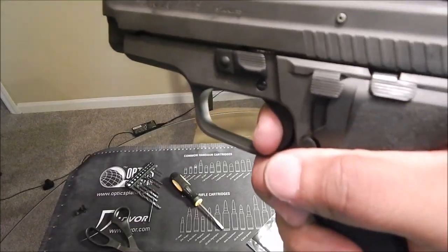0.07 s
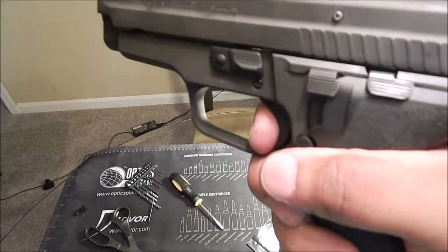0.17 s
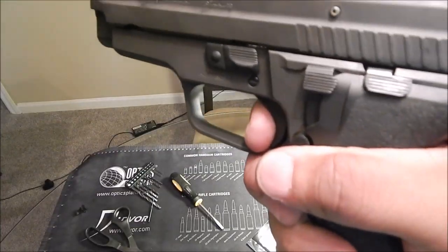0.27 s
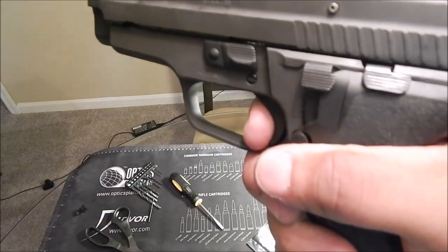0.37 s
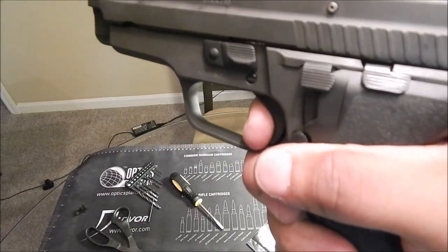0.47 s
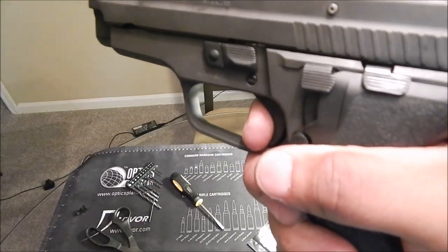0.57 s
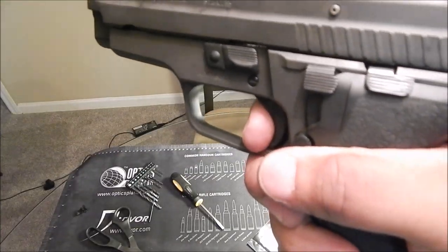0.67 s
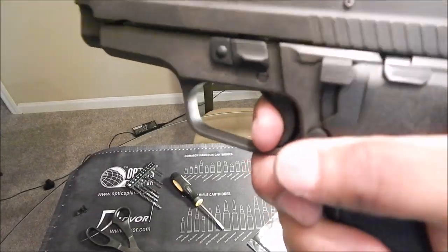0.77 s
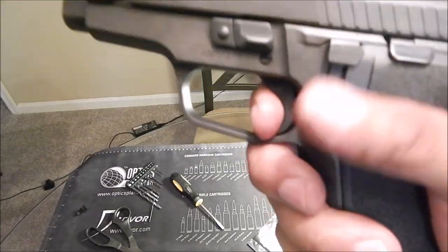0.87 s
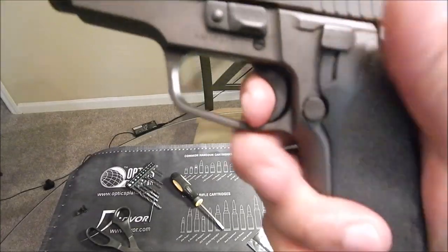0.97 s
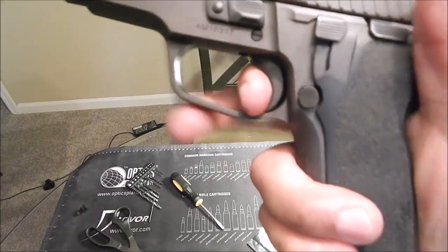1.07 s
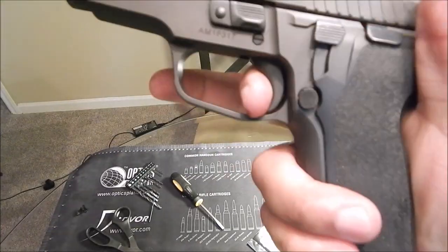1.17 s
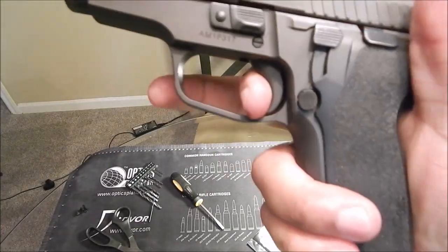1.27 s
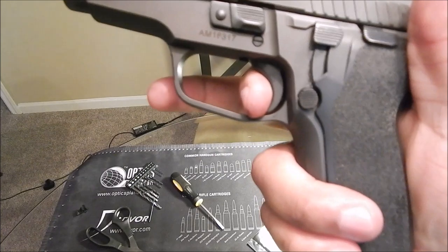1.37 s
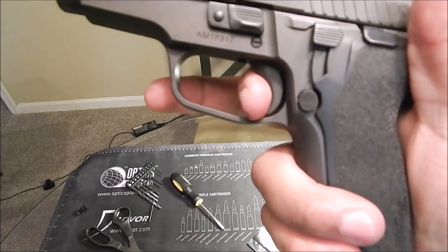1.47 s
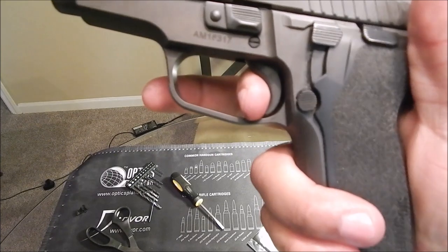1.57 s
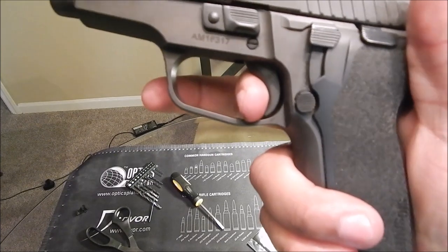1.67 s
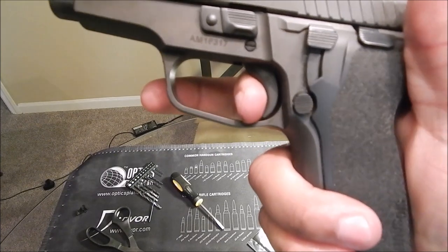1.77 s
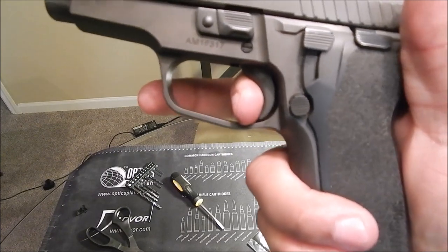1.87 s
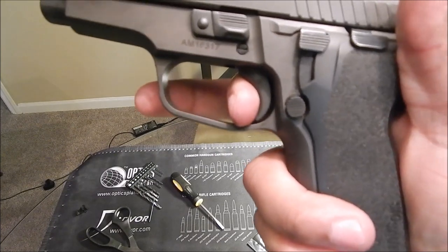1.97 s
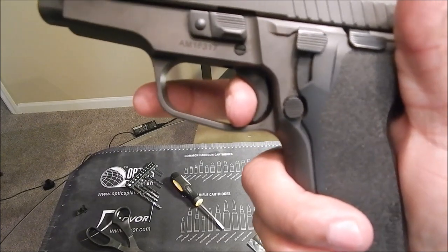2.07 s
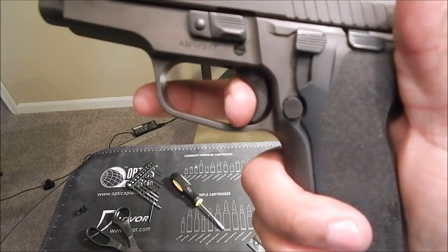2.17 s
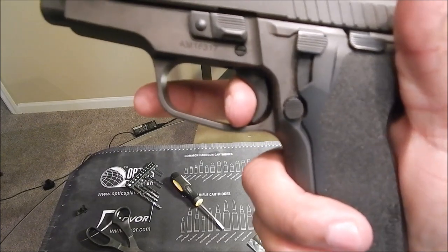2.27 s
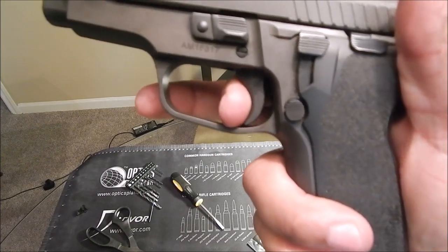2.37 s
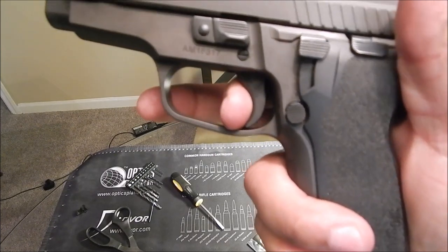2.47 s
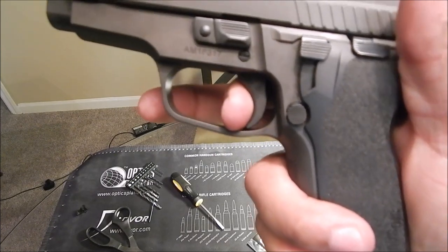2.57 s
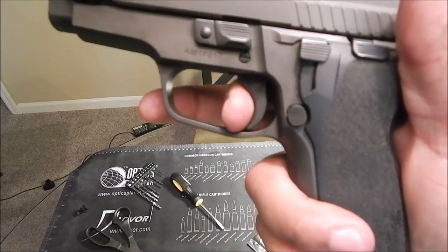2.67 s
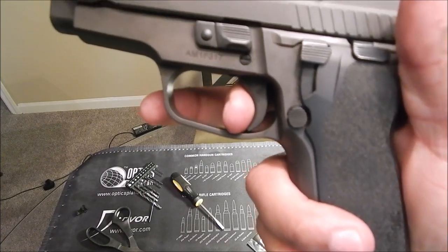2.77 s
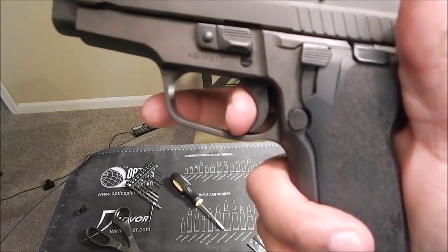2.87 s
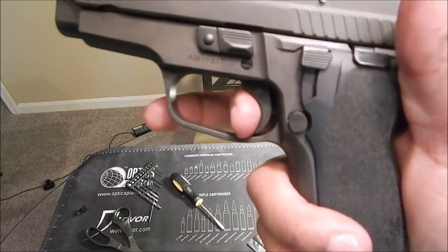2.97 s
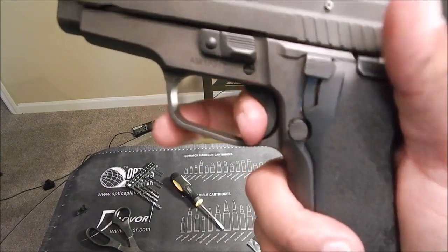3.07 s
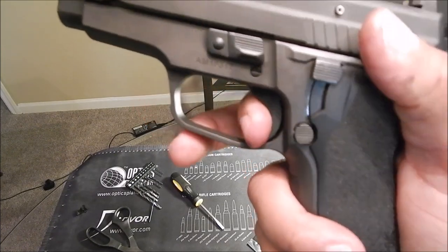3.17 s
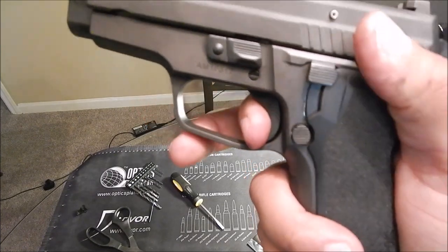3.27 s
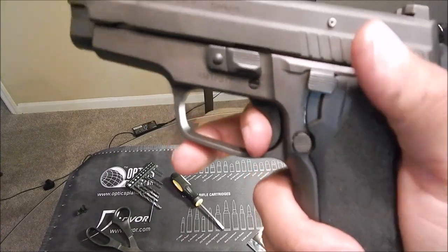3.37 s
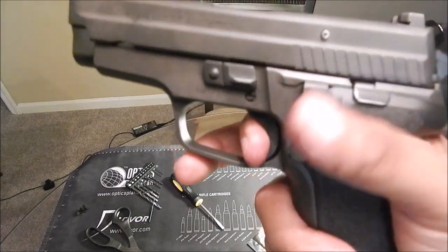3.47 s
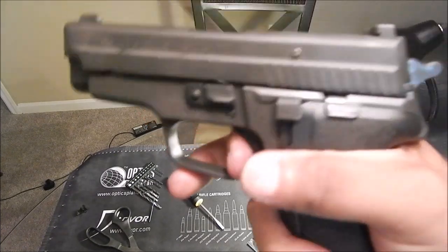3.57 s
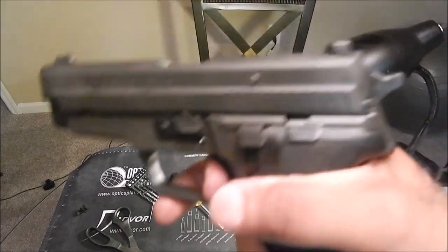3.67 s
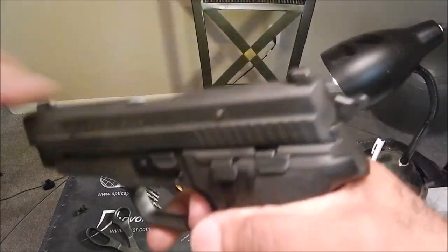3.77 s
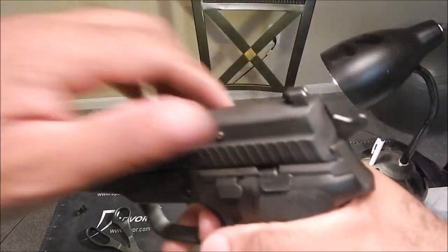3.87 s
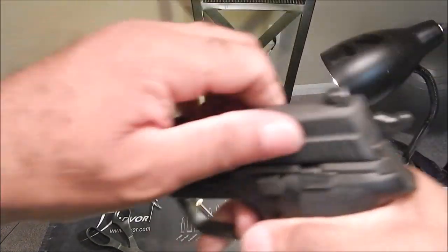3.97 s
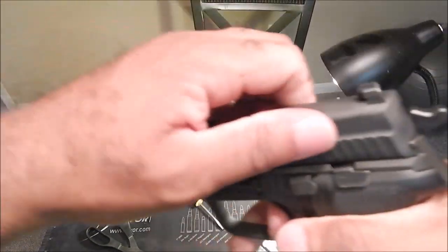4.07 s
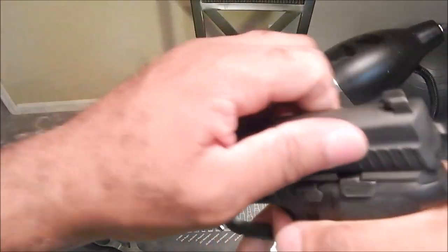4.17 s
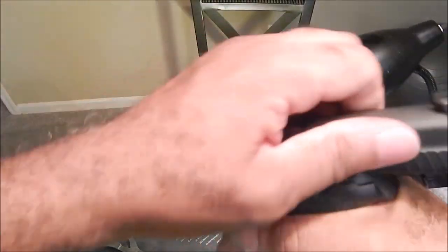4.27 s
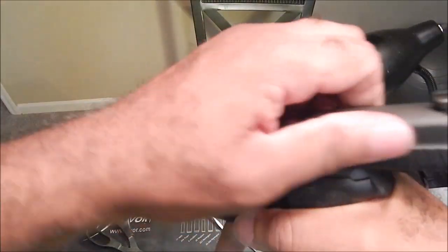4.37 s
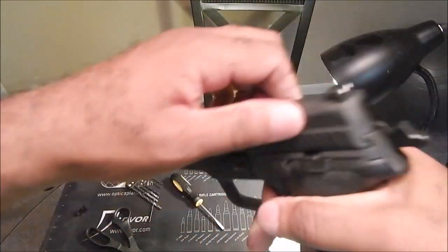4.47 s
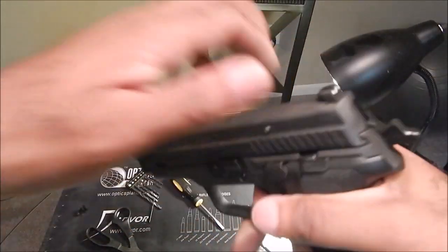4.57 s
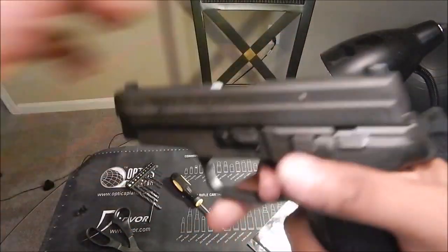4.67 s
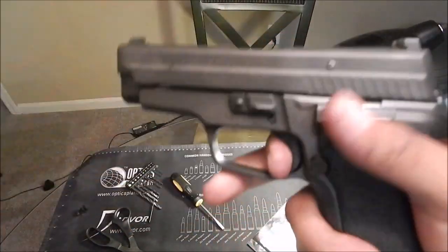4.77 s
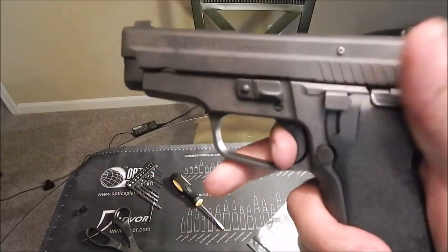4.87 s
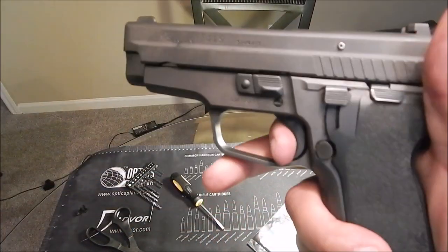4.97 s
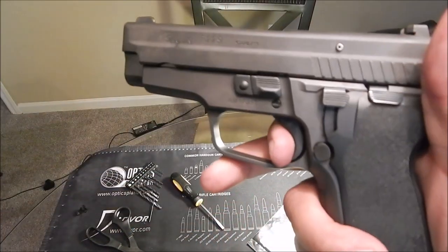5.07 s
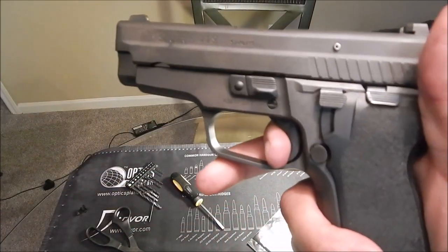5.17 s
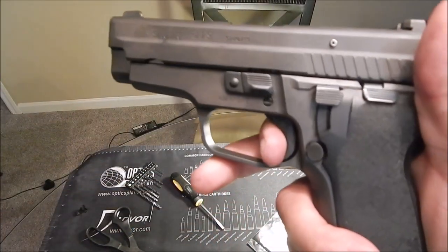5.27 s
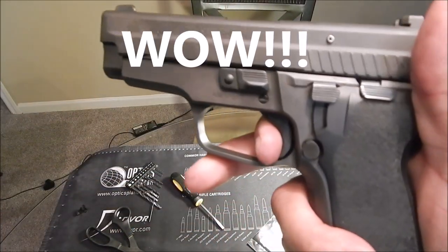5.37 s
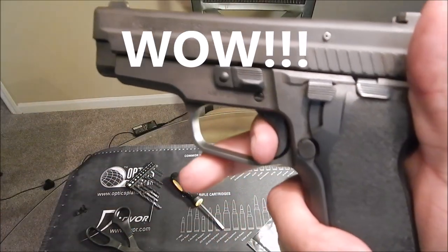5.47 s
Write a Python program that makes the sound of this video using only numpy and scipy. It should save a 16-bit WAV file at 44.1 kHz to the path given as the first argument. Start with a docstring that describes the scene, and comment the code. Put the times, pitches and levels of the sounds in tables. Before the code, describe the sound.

A soft, low rush of fan air with electrical hum swells up during the first second in a small carpeted room. Around 0.9 seconds a palm rubs faintly on a pistol's grip, then barely audibly tightens. At 2.3 seconds the trigger resets with a sharp, close metal click, and a tiny tick follows at 2.9. At 3.1 the hammer falls on an empty chamber with a hard, briefly ringing snap. From about 4.2 seconds the slide is drawn back with a light scrape and a cluster of steel clicks, striking its rear stop at 4.3 and clacking shut at 4.5. A faint spring zing lingers for a moment. The pistol is near the microphone, slightly to the right, with little echo. The fan and hum sink at every loud click and climb back slowly, still returning at the end, near 5.6 seconds.

```python
"""A pistol is worked close by in a small carpeted room: the trigger resets with a click, the hammer
falls on an empty chamber, then the slide is drawn back and let forward until the barrel locks.
Each blow is a flurry of steel contacts that rings the struck part; the rails and the palm rub,
and the recoil spring zings. Behind it a fan and mains hum sink at the loud clicks and swell back."""
import sys
import numpy as np
from scipy import signal
from scipy.fft import rfft, irfft, next_fast_len
from scipy.io import wavfile
from scipy.ndimage import uniform_filter1d

SR = 44100
rng = np.random.default_rng(int(sys.argv[2]) if len(sys.argv) > 2 else 0)


def store_wav(level_fs):
    """Save 16-bit WAV to argv[1]."""
    pcm = np.round(np.clip(np.atleast_2d(level_fs), -1, 1) * 32767)
    wavfile.write(sys.argv[1], SR, pcm.T.astype(np.int16))


N = 243431
T = np.arange(N) / SR


# trigger contacts: t/s, level/dB, chatter t60/s, thud/dB, clack/dB, snap/dB, treble/dB
TRIGGER_HITS = [(2.2726, 0.5, 0.008, -2.5, 1.5, 1.5, -3.5), (2.2752, -12.5, 0.0033, -3, 4, 0.5, 3),
                (2.2772, -13.5, .036, -2, 3, 1, 7), (2.925, -30.5, 0.016, -28.5, -0.5, 0.5, -1.5)]
# trigger modes: f/Hz, level/dB, t60/s
TRIGGER_MODES = [(1100, 7.5, .1), (2224, 5.5, 0.006), (3710, 5, 0.039), (4010, 8.5, 0.053),
                 (3970, 8.5, .07), (4360, 5.5, .05), (4950, 1, .02), (9600, -3, .01), (10200, 0, .012),
                 (11200, -2.5, .01), (12200, -1, .01)]
def trigger():
    """The trigger resets with a click, then creeps."""
    return blows(TRIGGER_HITS, TRIGGER_MODES, ring_db=-2.0, room_db=-10.5)


# hammer contacts: t/s, level/dB, chatter t60/s, thud/dB, clack/dB, snap/dB, treble/dB
HAMMER_HITS = [(3.0624, 0.5, 0.0052, -3, 1, -2.5, -8.5), (3.0639, -4, 0.004, -3, -4.5, -1.5, 4.5),
               (3.0659, -10.5, .008, 1, -2, 5, 11.5), (3.0672, -10.5, 0.077, -2.5, 2, 7, 9),
               (3.098, -25, 0.012, -13.5, 9.5, 4, 6.5), (3.107, -28, 0.06, -15.5, 5, 7, 7.5)]
# hammer modes: f/Hz, level/dB, t60/s
HAMMER_MODES = [(405.4, 4, 0.0084), (1058.7, 14, 0.15), (1240, -1.5, .011), (2135, 14.5, 0.12),
                (2280, 12, 0.09), (3100, -3.5, 0.012), (3780, -1, 0.0095), (5000, -3.5, .0031),
                (6200, 7, 0.18), (9930, 4.5, .06), (11110, 0, .015), (11650, -7.5, 0.0081)]
def hammer():
    """The hammer falls and bounces."""
    return blows(HAMMER_HITS, HAMMER_MODES, ring_db=-1.0, room_db=-16.5)


# slide and rear stop contacts: t/s, level/dB, chatter t60/s, thud/dB, clack/dB, snap/dB, treble/dB
SLIDE_HITS = [(4.1648, -12.5, 0.0093, -7.5, -8.5, -3.5, -13.5), (4.186, -11.5, 0.072, -5.5, -3.5, -1, -6),
              (4.1957, -11.5, 0.0072, 0, 0, 5.5, 9.5), (4.1982, -9, 0.016, 4, 4, 3, 9),
              (4.2042, -10.5, 0.028, -13.5, 1.5, 2.5, 0.5), (4.2615, -21, 0.0099, -12, 3.5, 3, 15.5),
              (4.2652, -22, 0.0058, -9, 4, 3, 12)]
STOP_HITS = [(4.2937, 1, 0.0066, -5, 2, -5.5, -1.5), (4.2968, -2.5, 0.039, -9, -2.5, -0.5, 3.5)]
# slide and frame modes: f/Hz, level/dB, t60/s
SLIDE_MODES = [(1060, 2.2, 0.016), (1778, 7, 0.046), (1900, 8, 0.054), (5920, 2, 0.0607), (7100, 9.9, .1),
               (7000, 10, 0.11), (7760, 4, .1), (10300, 4, 0.03), (10900, 3, .05)]
FRAME_MODES = [(1058, 4.5, .04), (1345, 3.5, 0.072), (1870, 14, .1), (2478, 3, .05), (3150, 6.5, .05),
               (3640, 6, 0.015), (7000, 4.5, .06), (7160, 8.5, .06), (9930, 1, .03), (13820, -0.5, .08)]
def slide():
    """The slide runs back, cocks the hammer, strikes its rear stop and rebounds."""
    cocking = blows(SLIDE_HITS, SLIDE_MODES, ring_db=3.0, room_db=-10.0)
    return cocking + blows(STOP_HITS, FRAME_MODES, ring_db=2.0, room_db=-10.0)


# locking contacts: t/s, level/dB, chatter t60/s, thud/dB, clack/dB, snap/dB, treble/dB
LOCK_HITS = [(4.4654, -3, 0.0095, -2, -0.5, -0.5, 4.5), (4.4677, -3.5, 0.012, -5, -3, 3.5, 1.5),
             (4.4711, -3.5, 0.048, -8.5, -0.5, -2, -4)]
# barrel modes: f/Hz, level/dB, t60/s
BARREL_MODES = [(473, 3, 0.026), (689, 8, 0.021), (1330, 4.5, 0.097), (1800, 2.5, 0.077), (2260, 1, 0.029),
                (3400, 2, 0.019), (4750, 9.5, 0.036), (6990, 7, 0.0074), (7760, 5.5, 0.009),
                (9700, 3.5, 0.011), (9800, 4, 0.013)]
def barrel():
    """The barrel locks as the slide closes."""
    return blows(LOCK_HITS, BARREL_MODES, ring_db=-0.5, room_db=-12.0)


def blows(hits, modes, ring_db, room_db):
    """All blows on one part; each comes from its own spot, so each has its own echoes."""
    out = np.zeros((2, N))
    ring = undb(ring_db) * ringing(modes)
    for at_s, db, chatter_t60, thud_db, clack_db, snap_db, treble_db in hits:
        # heavy contacts thud; light, hard ones are all treble
        tone = [(450, thud_db), (1100, 0.0029), (2000, clack_db), (3800, clack_db),
                (5300, snap_db), (9000, treble_db)]
        direct, radiated = undb(db) * strike(ring, chatter_t60, tone)
        start = int(at_s * SR) - LEAD_SAMPLES
        for sound in (direct, undb(room_db) * room(radiated)):
            out[:, start:start + sound.shape[1]] += sound[:, :N - start]
    return out


# steel-on-steel crack: f/Hz, level/dB
CRACK_SPECTRUM = [(60, -18), (220, -11.5), (430, 6), (800, 1.5), (1200, 5.5), (3000, 5), (6000, 2),
                  (8500, 2.5), (11000, 3.5), (13500, -2.5), (16000, -9.5)]
# pistol's shadow: f/Hz, left minus right/dB
LEFT_SHADOW = [(500, -7), (1100, -1.4), (4000, -2), (8000, -1), (13000, -4.5)]
LEAD_SAMPLES = 256  # space for a blow's leading edge
def strike(ring, chatter_t60, tone, width=1.2, width_hz=3500, lag_samples=2, grip_damp_s=0.15):
    """Contacts crack and drive the modes until the hand damps them. Returns direct sound and room feed."""
    t = T[:SR // 2]
    size = len(t)
    f = np.fft.rfftfreq(size, 1 / SR)
    steel = (undb(over_pitch(CRACK_SPECTRUM, size)) + ring) * undb(over_pitch(tone, size))
    shared = chatter(t, chatter_t60)
    apart = width * f / (f + width_hz)  # the sides grow unlike towards the treble
    shadow = undb(over_pitch(LEFT_SHADOW, size) / 2)
    left = irfft(steel * shadow * (shared + apart * chatter(t, chatter_t60)), size)
    right = irfft(steel / shadow * (shared + apart * chatter(t, chatter_t60)), size)
    # the room gathers all directions, so it gets the part's even spectrum
    radiated = irfft(steel * np.sqrt(1 + apart ** 2), size)
    direct = [np.roll(left, lag_samples), right]
    blow = np.roll([direct, [radiated, radiated]], LEAD_SAMPLES, axis=-1)
    return blow * np.exp(-(t / grip_damp_s) ** 4)


def chatter(t, t60, rise_s=0.00062, uneven_db=3):
    """Whitened spectrum of a flurry of tiny, uneven contacts that builds and dies."""
    contacts = rng.standard_normal(len(t)) * grains(len(t), 16, uneven_db)
    spectrum = rfft(contacts * (1 - np.exp(-t / rise_s)) * fade(t, t60))
    smooth_power = uniform_filter1d(uniform_filter1d(abs(spectrum) ** 2, size=201), size=201)
    return spectrum / np.sqrt(smooth_power)


def ringing(modes, weak_db=-2, weak_t60=0.085, weak_count=60):
    """Response of a part: its main modes among weak ones from pins and levers."""
    f = np.fft.rfftfreq(SR // 2, 1 / SR)
    weak = [(hz, weak_db, weak_t60) for hz in rng.uniform(1500, 15000, weak_count)]
    return sum(undb(db) / (1 + 2j * np.pi * (f - hz) * t60 / np.log(1000))
               for hz, db, t60 in modes + weak)


# slide travel back, at the rear and forward: t/s, hold/s, level/dB, rise/s, release t60/s
RAIL_STROKES = [(4.18, 0.033, -45.5, 0.071, 0.15), (4.268, 0.015, -49, 0.08, .04),
                (4.305, 0.0089, -45.5, 0.02, .36), (4.453, 0.012, -41.5, 0.04, .02)]
# steel sliding on steel: f/Hz, level/dB
RAIL_SPECTRUM = [(100, -11), (500, -9.5), (1100, -1), (1800, -1.5), (3000, -3), (6000, -6), (6950, -5),
                 (7200, 4), (7500, -6.5), (10000, -5), (16000, -11.5)]
def rails():
    """The slide grinds on its rails, which keeps it ringing."""
    return rubbing(RAIL_STROKES, RAIL_SPECTRUM, grain_db=1.5)


# palm shift, then a faint hiss swell: t/s, hold/s, level/dB, rise/s, release t60/s
PALM_STROKES = [(.865, 0.18, -61.5, 0.12, .17), (1.6, .66, -71, 1.0, .06)]
# skin on the grip: f/Hz, level/dB
PALM_SPECTRUM = [(100, -6), (500, -7), (1100, -2.5), (3000, -4), (6000, -7), (10000, -6), (16000, -11.5)]
def palm():
    """The palm shifts, then a faint hiss swells."""
    return rubbing(PALM_STROKES, PALM_SPECTRUM, grain_db=1.0)


def rubbing(strokes, tone, grain_db):
    """Friction: dense tiny slips of uneven size."""
    slips = grains(N, 64, grain_db) * rng.standard_normal((2, N))
    return unit(colour(slips, tone)) * envelope(strokes)


# jolts at each end of the slide's travel: t/s, hold/s, level/dB, rise/s, release t60/s
SPRING_JOLTS = [(4.296, 0.01, -55, 0.005, 0.54), (4.468, 0.01, -58, 0.005, 0.69)]
# coil zing: f/Hz, level/dB
SPRING_SPECTRUM = [(750, -35), (1040, 0), (1180, -6.5), (1330, -0.5), (1600, -5), (1800, -0.5),
                   (2100, -15.5), (3300, -12), (5000, -24), (8000, -50.5)]
def spring():
    """The coils of the jolted recoil spring buzz on as a faint, noisy zing."""
    return unit(colour(rng.standard_normal(N), SPRING_SPECTRUM)) * envelope(SPRING_JOLTS)


# room tail: f/Hz, level/dB, t60/s
ROOM_BANDS = [(150.2, -13, .3), (598, 0, 0.29), (1140, -2, 0.32), (2500, -0.5, 0.44), (4000, 0, 0.48),
              (5950, -1.5, .43), (9680, 1.5, 0.39), (16000, 6, 0.083)]
def room(x, build_s=0.0038, near_db=-2, near_t60=.07):
    """Quick reflections from hands and table, then a diffuse tail whose top treble dies first."""
    t = T[:SR]
    tail_noise, near_noise = rng.standard_normal((2, 2, SR))
    tail = 0
    for hz, db, t60 in ROOM_BANDS:
        band = over_pitch([(row[0], row[0] == hz) for row in ROOM_BANDS], SR)
        tail = tail + undb(db) * irfft(rfft(tail_noise) * band, SR) * fade(t, t60)
    tail = unit(tail * (1 - np.exp(-t / build_s)))
    near = undb(near_db) * unit(near_noise * fade(t, near_t60) * (t > .003))
    return signal.fftconvolve(x, (tail + near) / np.sqrt(SR), axes=1)[:, :N]


# rushing air: f/Hz, density/dB
FAN_SPECTRUM = [(20, -48), (48, -18), (58, -23.5), (70, -18.5), (92, -3.5), (145, -8), (180, -16),
                (265, -21), (390, -13), (520, -22.5), (850, -28.5), (1400, -30.5), (3000, -38), (5200, -49),
                (15000, -57)]
# left-right likeness of the air: f/Hz, coherence/0-1
FAN_COHERENCE = [(130, 0.98), (290, 0.94), (640, 0.8), (1400, 0.2), (3100, 0.08), (7000, 0)]
# mains hum and fan tones: f/Hz, level/dB
HUM_TONES = [(120, -44.5), (240, -68.5), (302, -69), (370.5, -73.5)]
def fan(air_db=-47, hiss_sink=1.7, waver_db=1.9):
    """Rushing air, alike on both sides in the bass, over slightly wavering hum."""
    coherence = np.clip(over_pitch(FAN_COHERENCE, N), 0, 1)
    mid = irfft(rfft(rng.standard_normal(N)) * np.sqrt(1 + coherence), N)
    side = irfft(rfft(rng.standard_normal(N)) * np.sqrt(1 - coherence), N)
    air = undb(air_db) * unit(colour(np.array([mid + side, mid - side]), FAN_SPECTRUM))
    rumble = colour(air, [(600, 0), (1500, -4), (3000, -10.5), (4500, -30.0)])
    hiss = air - rumble
    hum = sum(undb(db) * np.sqrt(2) * np.sin(2 * np.pi * (hz * T + rng.random()))
              for hz, db in HUM_TONES)
    hum *= undb(waver_db * waver(rate_hz=16))
    gain = swell()
    return (rumble + hum) * gain + hiss * gain ** hiss_sink  # duller as it sinks


# background dips, timed to the loud clicks: t/s, level/dB
BACKGROUND_DIPS = [(2.271, -15), (3.063, -36), (4.196, -24.5), (4.294, -23), (4.465, -34)]
def swell(opening_db=-15, sink_s=0.03, recover_db_per_s=17.5):
    """Background gain: opens low, sinks at each dip and climbs back at a steady pace."""
    db = np.minimum(opening_db + recover_db_per_s * T, 0)
    for at_s, low_db in BACKGROUND_DIPS:
        sunk = np.clip((T - at_s) / sink_s, 0, 1)
        climb_db = np.minimum(low_db + recover_db_per_s * (T - at_s), 0)
        db = (1 - sunk) * db + sunk * climb_db
    return undb(db)


def envelope(strokes):
    """Summed gain of movements: each rises 60 dB over rise_s up to its time, holds and dies away."""
    return sum(undb(db) * fade(np.maximum(at_s - T, 0), rise_s)
               * fade(np.maximum(T - at_s - hold_s, 0), release_t60)
               for at_s, hold_s, db, rise_s, release_t60 in strokes)


def grains(size, grain_samples, spread_db):
    """Random gain, held for each grain."""
    levels_db = spread_db * rng.standard_normal(size // grain_samples + 1)
    return undb(np.repeat(levels_db, grain_samples)[:size])


def waver(rate_hz):
    """Slow random wander, rms 1."""
    steps = int(N / SR * rate_hz) + 2
    return unit(np.interp(T * rate_hz, np.arange(steps), rng.standard_normal(1000)[:steps]))


def colour(x, rows):
    """Filter by (f/Hz, gain/dB) rows."""
    size = next_fast_len(x.shape[-1])
    return irfft(rfft(x, size) * undb(over_pitch(rows, size)), size)[..., :x.shape[-1]]


def over_pitch(rows, size):
    """Interpolate (f/Hz, value) rows on a log axis, one value per spectrum bin."""
    hz, value = np.transpose(rows)
    return np.interp(np.log(np.fft.rfftfreq(size, 1 / SR) + 1), np.log(hz), value)


def fade(t, t60):
    """Fall by 60 dB in t60 seconds."""
    return np.exp(-np.log(1000) * t / t60)


def undb(db):
    """Decibels to gain."""
    return 10 ** (np.asarray(db) / 20)


def unit(x):
    """Scale to rms 1."""
    return x / np.sqrt(np.mean(x ** 2))


def scene(clicks_db=-7.5, rub_pan_db=-2):
    """The pistol, slightly to the right, in front of the fan."""
    clicks = undb(clicks_db) * (trigger() + hammer() + slide() + barrel())
    friction = (palm() + rails()) * undb([[rub_pan_db / 2], [-rub_pan_db / 2]])
    return clicks + friction + spring() + fan()


def record(dry, hiss_db=-104, top_hz=15950):
    """Faint electronic hiss and a steep cut at the top."""
    hiss = undb(hiss_db) * rng.standard_normal(dry.shape)
    lowpass = signal.ellip(10, .1, 80, top_hz, fs=SR, output="sos")
    return signal.sosfilt(lowpass, dry + hiss)


dry = scene()
out = record(dry)
store_wav(out)
```